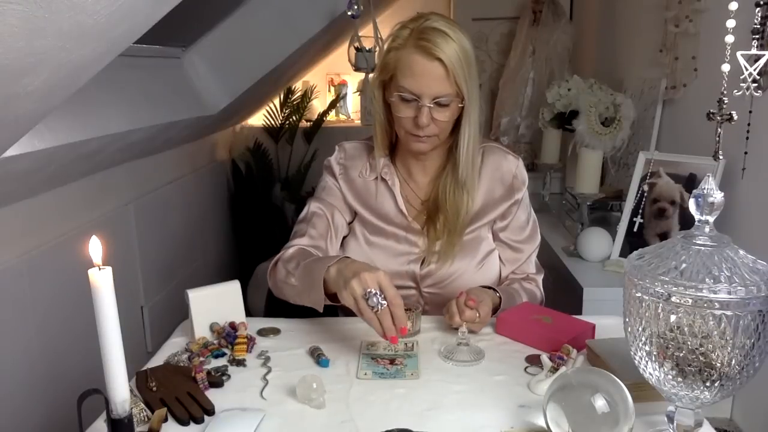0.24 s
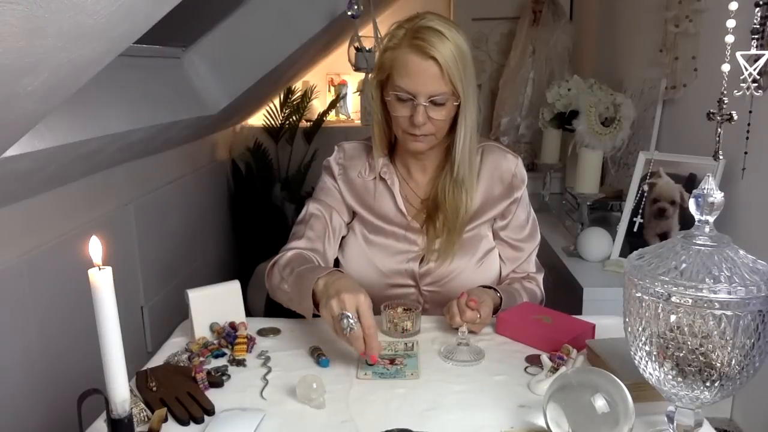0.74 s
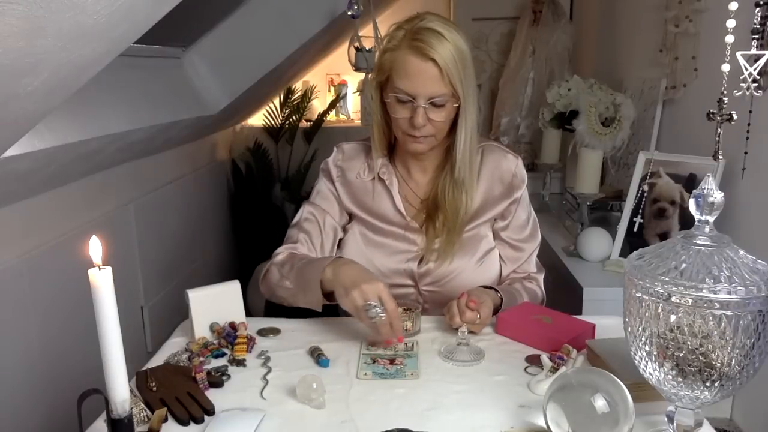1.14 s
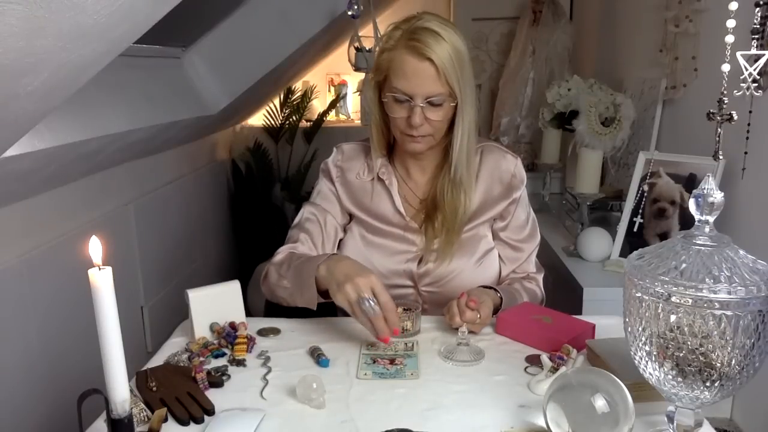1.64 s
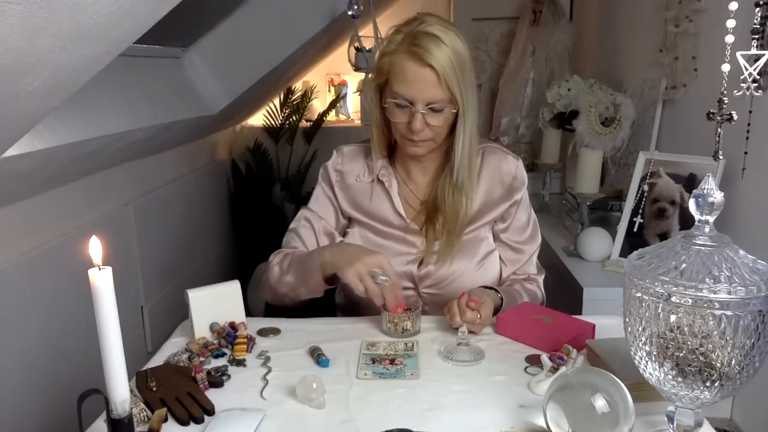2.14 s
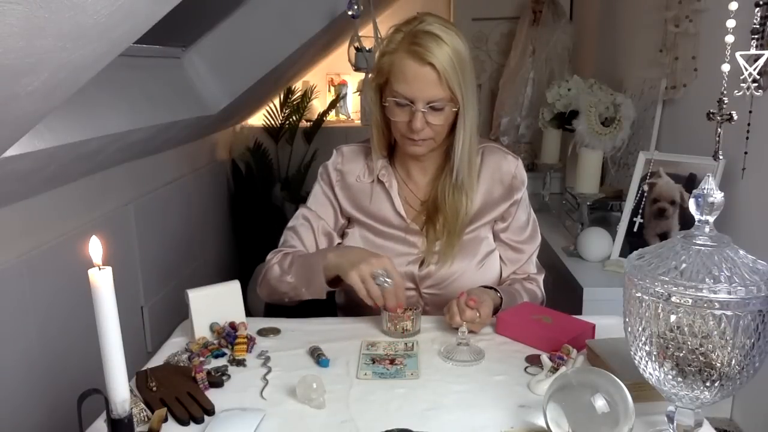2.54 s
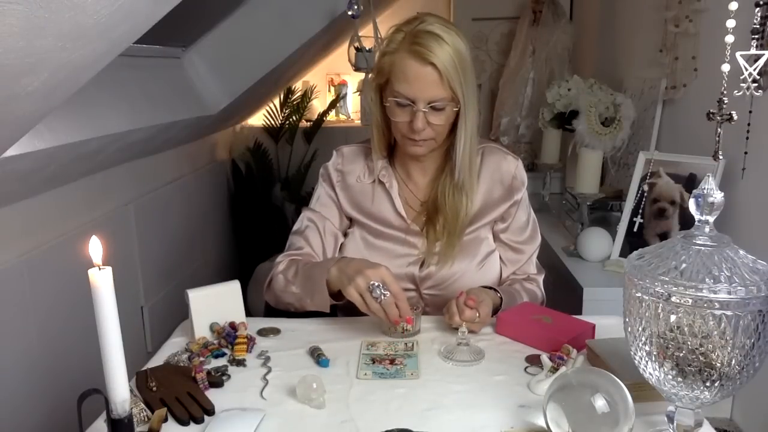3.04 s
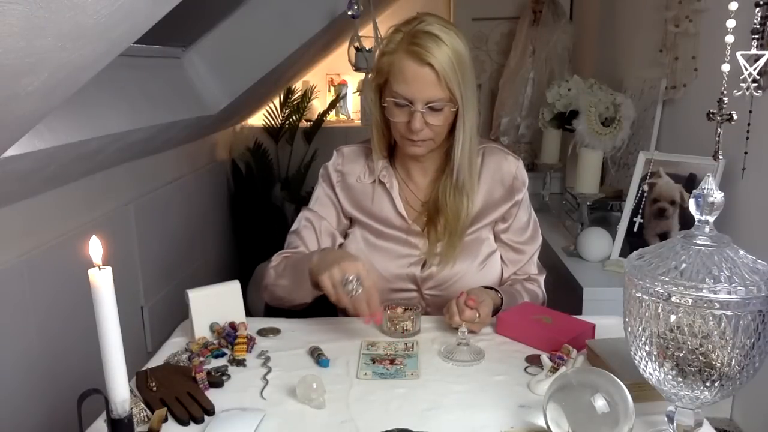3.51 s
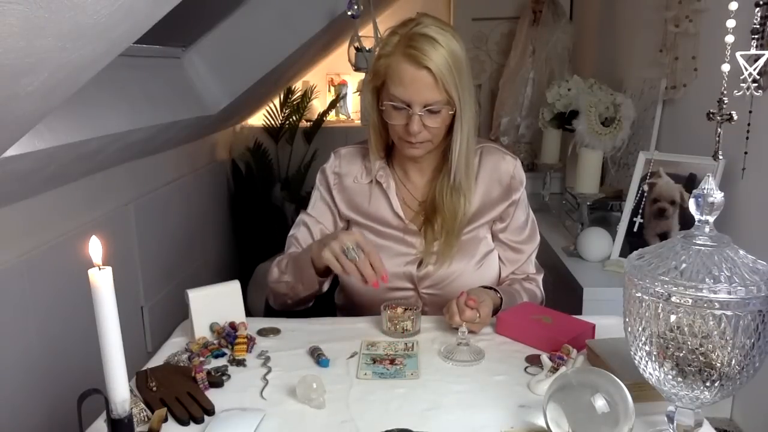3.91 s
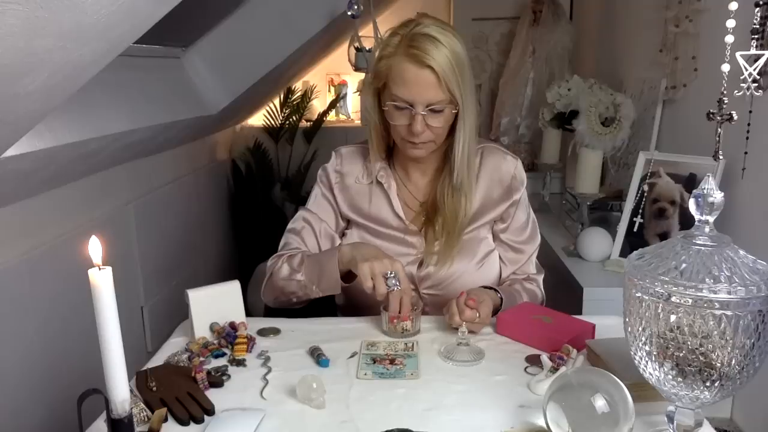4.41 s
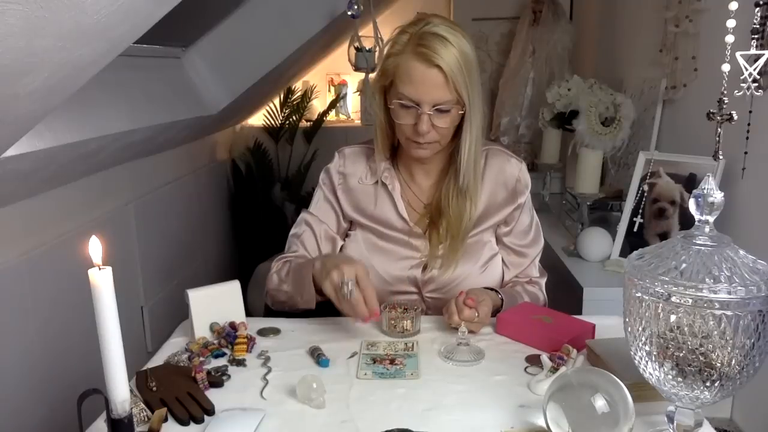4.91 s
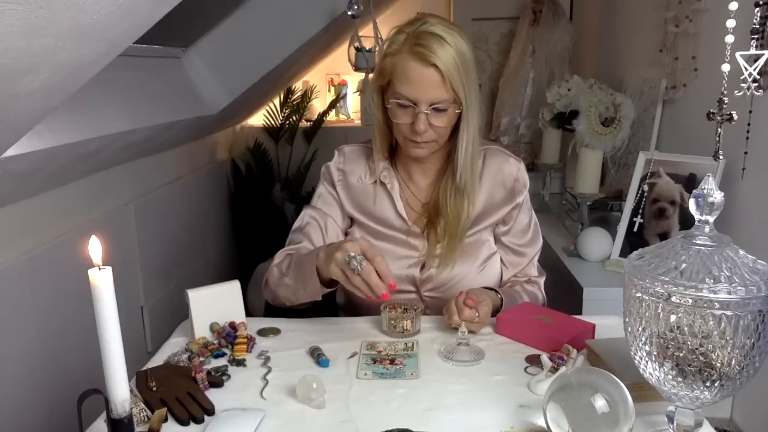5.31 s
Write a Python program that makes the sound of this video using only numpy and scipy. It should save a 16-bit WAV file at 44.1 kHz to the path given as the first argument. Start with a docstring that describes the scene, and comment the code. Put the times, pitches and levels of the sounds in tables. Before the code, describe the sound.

A small, quiet room with a faint low rumble and thin hiss, heard by one microphone near a hard tabletop. At 0.1 seconds a faint metal tick comes, then from 0.24 small charms knock the table and bounce lightly. Soft ticks at 0.75 lead to more bouncing taps from 0.8 to about 1.2. Around 1.8 a firmer drop rattles, and the brightest metal tick, with a thin high ring, sounds at 1.87. From 2.25 to 2.7 fingers rummage through charms in a glass dish: a dense glittery jingle, sharp clinks and a slight table rumble, settling quickly. After a pause, charms land with short rattles at 3.34 and 3.67. Quiet follows until 4.4, when a second rummage brings strong glassy clinks near 4.5, fading by about 4.9. The last charms clatter and bounce between 5.1 and 5.4, leaving quiet room tone.

```python
"""In a small quiet room, over filtered noise, small metal charms are picked from a glass dish and dropped.
Early on, charms touch between the fingers: each touch is a noisy tick plus thin, fading sine tones.
Then charms fall on a hard table, bounce and settle: taps, with waves that ring the table's resonances.
Around 2.3 s and again around 4.4 s fingers rummage in the dish: many tiny pings make the heap jingle.
Ticks, rings and landings go on between and after; the last landings come a little after 5 s."""
import sys
import numpy as np
from scipy import signal
from scipy.fft import rfft, irfft, next_fast_len
from scipy.io import wavfile
from scipy.ndimage import uniform_filter1d, map_coordinates

SR = 44100
rng = np.random.default_rng(int(sys.argv[2]) if len(sys.argv) > 2 else 0)


def wrap_up_sound(samples):
    """Save the sound to the file named by the first command line argument, as 16-bit audio."""
    columns = np.atleast_2d(samples).T
    # keep every value between -1 and 1, then stretch to whole-number steps
    tamed = np.clip(columns, -1, 1)
    steps = np.round(tamed * 32767).astype(np.int16)
    wavfile.write(sys.argv[1], SR, steps)


N = 245195  # length of the scene, samples
TOP_HZ = 16000  # nothing is heard from here up
T = np.arange(SR // 2) / SR  # clock for one contact, s

# room tone, relative to its overall level: [f/Hz, level per Hz/dB]
ROOM_TONE = [(12, -44), (20, -3), (98, -3), (122, -20), (157, -18.5), (180, -22.5), (274, -22), (333, -26),
             (565, -29.5), (746, -33), (1500, -32), (1720, -36), (5530, -41), (11100, -41), (15500, -44)]
# how long the near walls answer: [f/Hz, time to fade by 60 dB/s]
NEAR_WALLS = [(200, 0.22), (1200, 0.26), (4000, 0.15), (9000, 0.098), (15000, 0.12)]
# how long the far corners answer: [f/Hz, time to fade by 60 dB/s]
FAR_CORNERS = [(200, 0.85), (1200, 0.51), (2500, 0.65), (9000, .28), (15000, .18)]
# a charm meets another or the glass: [t/s, relative tick level/dB, ring level/dB, what rings]
TOUCHES = [(0.095, -27.5, -47, "c"), (0.725, -34, -46, "a"), (0.743, -28, -42, "b"),
           (0.7577, -32.5, -39, "c"), (1.713, -44.5, -39, "a"), (1.734, -34.5, -34.5, "a"),
           (1.851, -26.5, -20, "a"), (1.8686, 0, -29, "b"), (2.2702, -16.5, -43, "glass"),
           (2.2852, -21, -28, "glass"), (2.374, -8, -23, "d"), (2.4667, -13.5, -46, "e"),
           (2.525, -30.5, -38.5, "a"), (2.6033, -17.5, -58, "glass"), (3.256, -36, -42, "e"),
           (4.377, -18, -53.5, "glass"), (4.4752, -9, -37, "glass"), (4.5291, -4.5, -22, "glass"),
           (4.5549, -4, -19, "glass"), (4.7207, -13.5, -32.5, "f"), (5.1821, -16, -50, "glass")]
# high bending modes of six charms (a to f) and of the glass,
# by name: [f/Hz, level relative to the ring/dB, time to fade by 60 dB/s]
BENDING_MODES = {"a": [(10763, 0, .19), (14264, -15, .18)], "b": [(12911, 0, .12)], "c": [(6815, -3, .11),
                 (13050, 0, .09), (14770, -4, .09)], "d": [(11400, 0, .11)], "e": [(5900, -9, .09),
                 (13300, 0, .09), (13800, 0, .11)], "f": [(6550, -10, .2), (15200, 0, .09)],
                 "glass": [(10130, -3, .07), (10230, 0, .12), (10400, -3, .07)]}
# tone of bare metal scraping on metal: [f/Hz, level/dB]
BARE_METAL = [(200, -19.5), (700, -15.5), (2000, -19.5), (4400, -7), (6500, 2), (15500, 0)]
# resonances of the filled glass dish: [f/Hz, width/Hz, level/dB]
DISH_MODES = [(910, 210, -11), (1230, 120, -6), (1655, 250, 1.5), (2290, 190, -5.5), (2940, 250, -3.5),
              (3380, 380, -5.5), (5150, 380, -7.5), (6220, 680, 1.5), (7020, 680, .5), (8550, 1400, -4.5),
              (10230, 560, 9.5), (11650, 1450, -2.5), (13550, 1700, -3.5), (15180, 750, .5)]
# charms dropped on the table: [t/s, knock level/dB, thud re knock/dB, clack re knock/dB, click re knock/dB,
# first flight/s, next flight over last/ratio, loss per bounce/dB, bounces/count before rounding]
FALLS = [(0.2382, -17.5, -4.5, -7.5, -14.5, 0.084, 1, 2, 1), (0.2966, -23, -16, -8.5, -17.5, 0.02, 1, 6, 1),
         (0.7957, -20.5, -1, -6.5, -12, 0.12, .65, 7.5, 3), (1.0588, -36, -8, -4, -9.5, 0, 1, 0, 0),
         (1.0794, -16.5, -9.5, -8.5, -12.5, 0.026, 1.14, 3, 2),
         (1.1428, -24.5, -15.5, -8.5, -11, 0.019, 1, 3, 1), (1.7725, -17, -10, -10, -6.5, 0, 1, 0, 0),
         (1.7747, -9.5, -11.5, -10.5, -13.5, .0597, 1.26, 5, 2), (1.9943, -42.5, -9, -10, -9, 0, 1, 0, 0),
         (3.3389, -17, -9.5, -7.5, -11, 0.035, .66, 4.5, 2),
         (3.6686, -15.5, -8, -6.5, -9, .0155, 1.16, 6, 3),
         (5.126, -15, -10.5, -7.5, -11.5, 0.083, .707, 5.5, 2),
         (5.1424, -21, -6.5, -7, -7.5, 0.026, 1, 6, 2), (5.2299, -22, -13, -9.5, -12, 0.067, .41, 8, 1.5),
         (5.3626, -32.5, -13.5, -7.5, -10.5, 0.0064, 1, 0.5, 1)]
# resonances of the table top: [f/Hz, width/Hz, relative level/dB]
TABLE_MODES = [(385, 110, -13), (505, 85, -9), (613, 31, 1.5), (779, 35, -4.5), (847, 29, -4.5),
               (911, 35, 3.5), (958, 34, -1.5), (1178, 27, 3.5), (1224, 31, 1.5), (1345, 41, -1.5),
               (1516, 48, -6.5), (1680, 62, .5), (1813, 33, -.5), (1981, 58, -7), (2132, 66, -5.5),
               (2234, 58, -7.5), (2590, 160, -11.5), (2882, 68, -6.5), (3280, 160, -12)]
# tone of the dry tap on the table: [f/Hz, relative level/dB]
TAP_TONE = [(60, -5), (160, -13), (300, -0.5), (500, 2), (1100, 6), (2300, 5), (4200, 0.5), (7000, -0.5),
            (10000, -7), (15500, -19)]
# finger strokes through the heap: [start t/s, relative jingle level/dB, hold/s]
FINGER_STROKES = [(2.251, -29, 0.011), (2.33, -30, .02), (2.418, -33.5, 0.088), (2.57, -31.5, 0.051),
                  (4.386, -29.5, 0.0042), (4.433, -27.5, 0.026), (4.504, -27.5, 0.089),
                  (4.672, -32.5, 0.0049)]

# a bouncing charm comes down tilted: its edge lands first, by this share of the flight, and softer
EDGE_LEAD, EDGE_DB = .13, -7.5
EDGE_MAX_S = .0105  # the longest time from edge to face
THUD_DB_PER_BOUNCE, CLICK_DB_PER_BOUNCE = -0.5, 1  # later bounces are thinner
STROKE_ATTACK_S, SETTLE_T60_S = 0.022, 0.19  # the fingers dig in; the heap comes to rest
PRESSED_DB = -6  # the pressed heap damps the treble of the glass
# table rumble: level where the smoothed stirring is 1, its dB per dB of stirring, smoothing time
LEAN_DB, LEAN_GROWS, LEAN_S = -39.5, 1.33, .06


def amp(db):
    """Turn decibels into a gain."""
    return 10 ** (np.asarray(db) / 20)


def unit(x):
    """Scale to an average (rms) level of 1."""
    return x / np.sqrt(np.mean(x ** 2) + 1e-20)


def norm(x):
    """Scale to a total energy of 1."""
    return x / np.sqrt(np.sum(x ** 2) + 1e-20)


def fade(t, t60):
    """Die away smoothly, by 60 dB in t60 seconds."""
    return np.exp(-np.log(1000) * t / t60)


def along(points, hz):
    """Read a curve of (f/Hz, value) points, with pitch on a log axis."""
    f, value = np.transpose(points)
    return np.interp(np.log(hz + 1), np.log(f), value)


def add(track, s, sound):
    """Mix a sound into the track at s seconds."""
    part = track[round(s * SR):][:len(sound)]
    part += sound[:len(part)]


def coloured(x, *spectra):
    """Filter by the sum of (f/Hz, level/dB) curves, with no sound ahead of its cause (minimum phase)."""
    m = 2 * next_fast_len(len(x) // 2 + 1024)
    hz = np.fft.rfftfreq(m, 1 / SR)
    level_db = sum(along(s, hz) for s in spectra)
    # folding the cepstrum forward in time gives the filter its phase
    cepstrum = irfft(np.log(amp(level_db)))
    cepstrum[1:m // 2] *= 2
    cepstrum[m // 2 + 1:] = 0
    response = np.exp(rfft(cepstrum))
    return irfft(rfft(x, m) * response)[:len(x)]


def resonant(x, modes):
    """Hear x through a body that rings at its (f/Hz, width/Hz, level/dB) resonances."""
    m = next_fast_len(len(x) + 4096)
    f = np.fft.rfftfreq(m, 1 / SR)
    response = 0
    for k, (centre, width, db) in enumerate(modes):
        peak = 1j * f * width / (centre * centre - f * f + 1j * f * width)
        response = response + (-1) ** k * amp(db) * peak  # neighbours have opposite signs
    return irfft(rfft(x, m) * response, m)[:len(x)]


def contact():
    """One hard tap: a single-sample pulse."""
    return -signal.unit_impulse(len(T))


def scatter(t60, gap):
    """Dense waves return through a struck body just after the contact: fading noise of energy 1."""
    build_up = 1 - np.exp(-(T / gap) ** 2)
    return norm(rng.standard_normal(len(T)) * fade(T, t60) * build_up)


def in_room(x, near_db, far_db):
    """Add the quick answer of the walls and a faint longer tail: noise whose fade depends on pitch."""
    hz, _, z = signal.stft(rng.standard_normal(len(T)), SR, nperseg=256)
    near = amp(near_db) * fade(T_FRAMES(z), along(NEAR_WALLS, hz)[:, None])
    far = amp(far_db) * fade(T_FRAMES(z), along(FAR_CORNERS, hz)[:, None])
    tail = signal.istft(z * (near + far), SR, nperseg=256)[1][:len(T)]
    tail = tail * (1 - np.exp(-(T / 0.0045) ** 2))
    # near_db sets the energy of the whole tail; far_db against near_db sets its mix
    return x + signal.fftconvolve(x, amp(near_db) * norm(tail))[:len(x)]


def T_FRAMES(z):
    """Times of the short noise frames, 128 samples apart, in seconds."""
    return np.arange(z.shape[1]) * 128 / SR


def in_dish(x, damped_db=0):
    """Metal contacts are heard directly and through the glass, whose treble may be damped."""
    through_glass = resonant(coloured(x, [(3400, 0), (5800, damped_db)]), DISH_MODES)
    return coloured(x, BARE_METAL) + through_glass


def room_tone():
    """A low rumble under a thin even hiss, made from filtered noise."""
    return amp(-47) * unit(coloured(rng.standard_normal(N), ROOM_TONE))


def clinks():
    """Charm meets charm or glass: a tap and a very short burst of waves make a bright tick."""
    out = np.zeros(N)
    for s, tick_db, _, _ in TOUCHES:
        strike = norm(contact() + amp(6.5) * scatter(t60=.022, gap=.00025))
        add(out, s, amp(tick_db + 5) * in_room(strike, near_db=-5.5, far_db=-48.5))
    return coloured(in_dish(out), [(1500, -1.0), (6000, -1.5), (12000, -1.0), (15500, -5.5)])


def rings():
    """A touched charm or the glass sings on its high bending modes; the fades waver, as with reflections."""
    out = np.zeros(N)
    for s, _, ring_db, body in TOUCHES:
        for hz, db, t60 in BENDING_MODES[body]:
            # random wobble, 130 new values a second
            flutter = map_coordinates(rng.standard_normal(len(T)), [T * 130], order=1)
            onset = 1 - np.exp(-T / 0.00018)
            tone = np.sin(2 * np.pi * hz * T + .35 * flutter) * fade(T, t60) * onset
            wobble_db = 2.1 * flutter * (1 - np.exp(-T / .015))
            add(out, s, amp(ring_db + db + wobble_db) * tone)
    return out


def landings():
    """List each touch of the table: the fall, then a tilted charm's edge and face at every bounce."""
    for s, knock_db, thud_db, clack_db, click_db, flight, ratio, loss_db, bounces in FALLS:
        yield s, knock_db, thud_db, clack_db, click_db
        for _ in range(round(bounces)):
            s, knock_db = s + flight, knock_db - loss_db
            thud_db, click_db = thud_db + THUD_DB_PER_BOUNCE, click_db + CLICK_DB_PER_BOUNCE
            edge_s = s - min(EDGE_LEAD * flight, EDGE_MAX_S)
            yield edge_s, knock_db + EDGE_DB, thud_db, clack_db, click_db
            yield s, knock_db, thud_db, clack_db, click_db
            flight *= ratio


def drops():
    """Each landing is a sharp tap, then waves that scatter through the table top and ring its resonances."""
    out = np.zeros(N)
    top = resonant(contact(), TABLE_MODES)
    for s, knock_db, thud_db, clack_db, click_db in landings():
        # thud, clack and click are the low, middle and high parts of the blow
        hardness = [(580, thud_db), (1020, -6.5), (2250, clack_db), (6400, click_db)]
        # the waves lose some treble on the way
        waves = scatter(t60=0.035, gap=0.0015)
        waves = amp(3.0) * coloured(waves, [(2000, 0.91), (7000, -1.2), (14000, 0)])
        blow = coloured(contact() + waves, hardness)
        tap = amp(30.5) * coloured(blow, TAP_TONE)
        ring = amp(25) * norm(signal.fftconvolve(blow, top)[:len(T)])
        sound = in_room(tap, near_db=-4, far_db=-28) + in_room(ring, near_db=-12, far_db=-19)
        add(out, s, amp(knock_db) * sound)
    return out


def collisions(count):
    """Tiny impacts at random moments, each ringing briefly at a pitch of its own."""
    when, pitch, size, phase = rng.random((count, 4)).T[:, :, None]
    hz = 400 + pitch * (TOP_HZ - 400)
    t = T[:200]
    # the fourth power makes most impacts small and a few large
    pings = size ** 4 * np.sin(2 * np.pi * (hz * t + phase)) * fade(t, t60=.004)
    index = (when * N).astype(int) + np.arange(len(t))
    return np.bincount(index.ravel(), pings.ravel(), N)[:N]


def stirring():
    """Gain of the stirring: each stroke builds up, holds and dies away as the heap settles."""
    t = np.arange(N) / SR
    strokes = []
    for s, db, hold in FINGER_STROKES:
        rise = np.clip((t - s) / STROKE_ATTACK_S, 0, 1) ** 2
        settle = fade(np.maximum(t - s - STROKE_ATTACK_S - hold, 0), SETTLE_T60_S)
        strokes.append(amp(db) * rise * settle)
    return np.max(strokes, axis=0)  # the strongest stroke wins


def rummage():
    """Stirred charms scrape and collide thousands of times a second; the hand makes the table rumble softly."""
    slips = (rng.random(N) < 1500 / SR) * rng.standard_normal(N)  # about 1500 a second
    jingle = unit(collisions(count=12000)) + amp(5) * unit(slips)
    # the charms catch on each other and give way in small clumps: 180 random levels a second
    clump_steps = np.arange(N) * 180 / SR
    clumps = amp(2.5 * map_coordinates(rng.standard_normal(N // 100), [clump_steps], order=1))
    effort = stirring()
    dish_sound = unit(in_dish(clumps * jingle, PRESSED_DB))
    heap = in_room(effort * dish_sound, near_db=2, far_db=-33)
    rumble_tone = [(45, -56.0), (72, 8), (86, -7.0), (130, -11.5), (500, -73)]
    rumble = unit(coloured(rng.standard_normal(N), rumble_tone))
    smooth_effort = uniform_filter1d(effort / effort.max(), round(LEAN_S * SR))
    lean = np.abs(smooth_effort) ** LEAN_GROWS
    return amp(-5.0) * heap + amp(LEAN_DB) * lean * rumble


def scene():
    """All the sounds added together, as one microphone near the table hears them."""
    return (room_tone() + clinks() + rings() + drops() + rummage())[None]


def record(dry):
    """Clip anything beyond full scale, then remove everything from the band limit up."""
    m = next_fast_len(N + SR // 2)
    passed = np.fft.rfftfreq(m, 1 / SR) < TOP_HZ
    return irfft(rfft(np.clip(dry, -1, 1), m) * passed, m)[:, :N]


dry = scene()
out = record(dry)
wrap_up_sound(out)
```